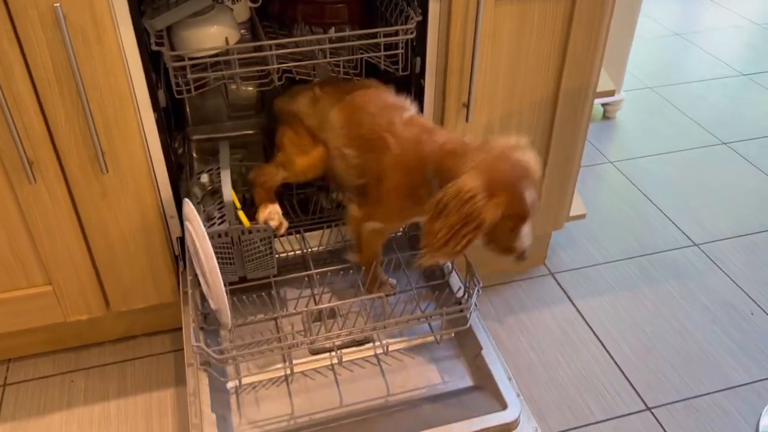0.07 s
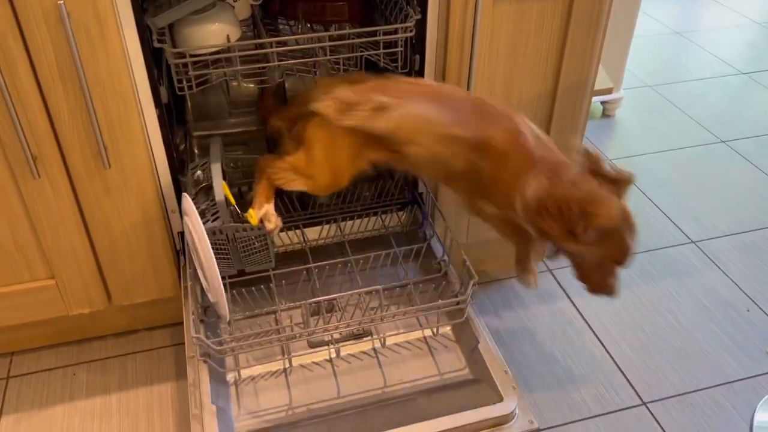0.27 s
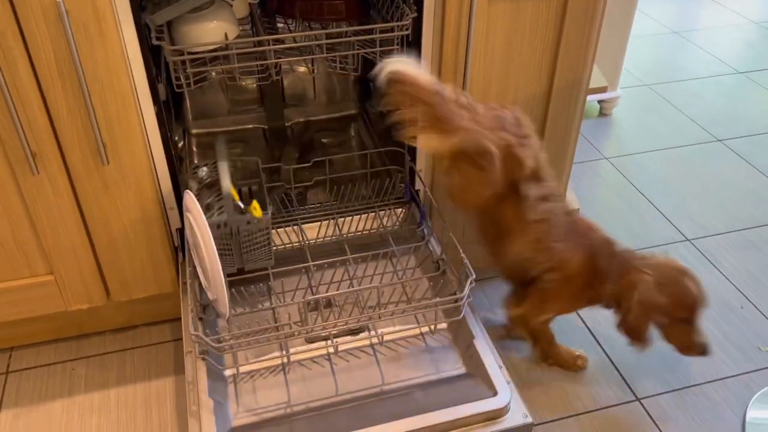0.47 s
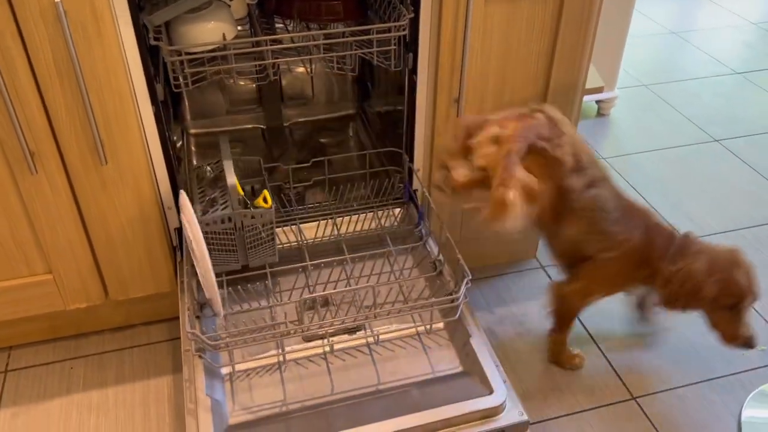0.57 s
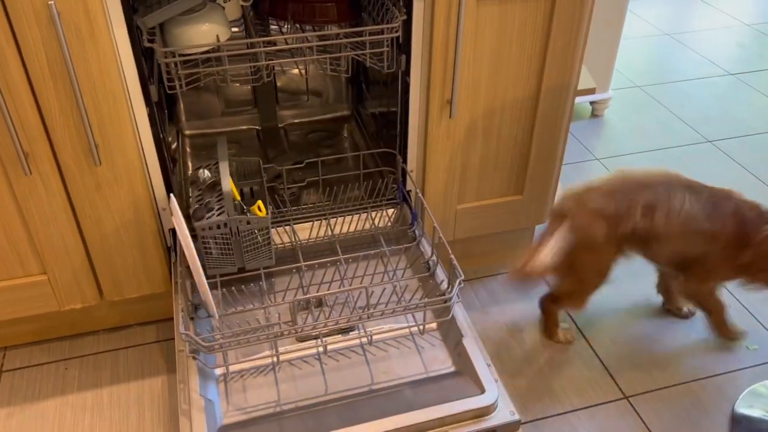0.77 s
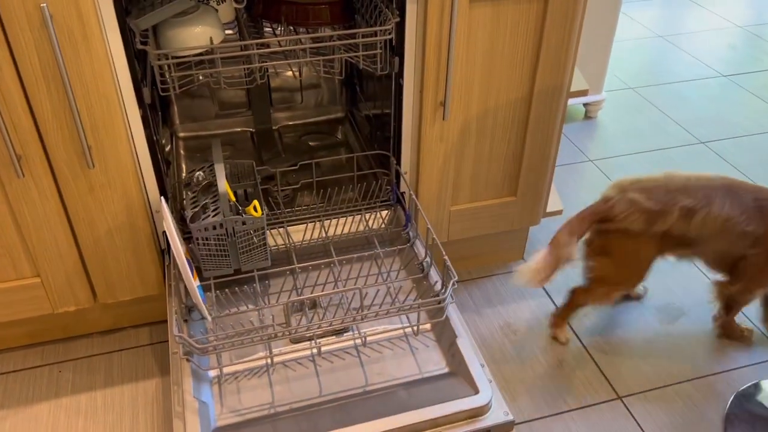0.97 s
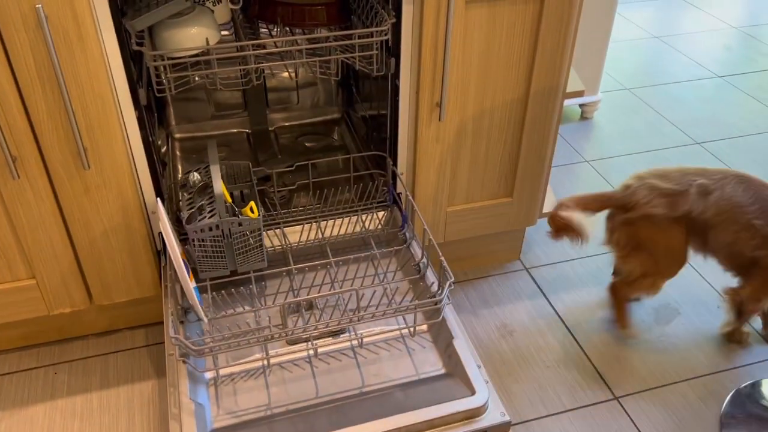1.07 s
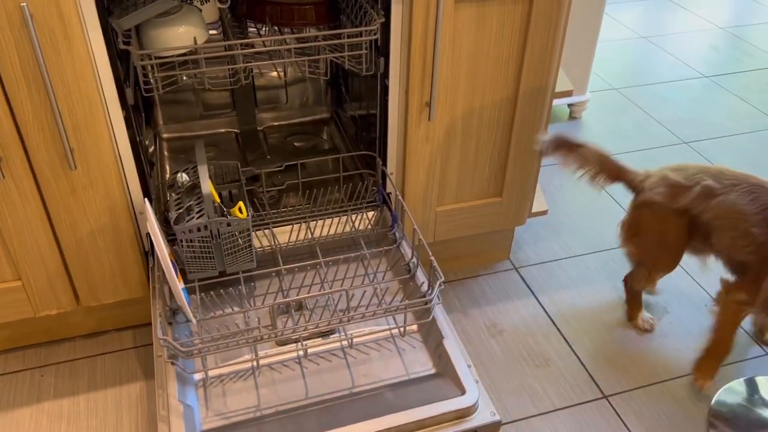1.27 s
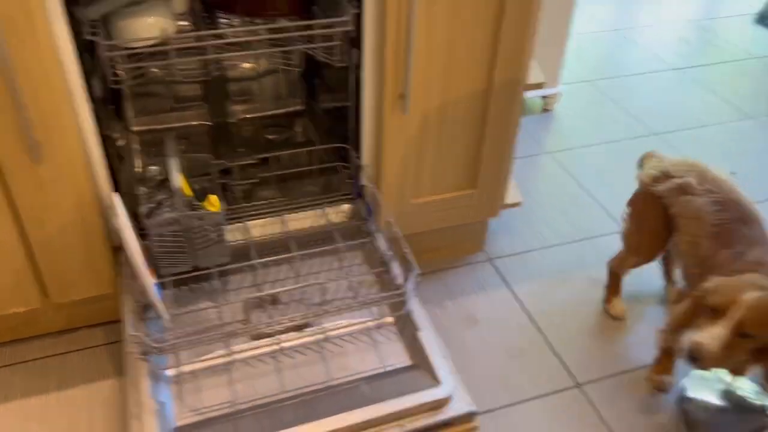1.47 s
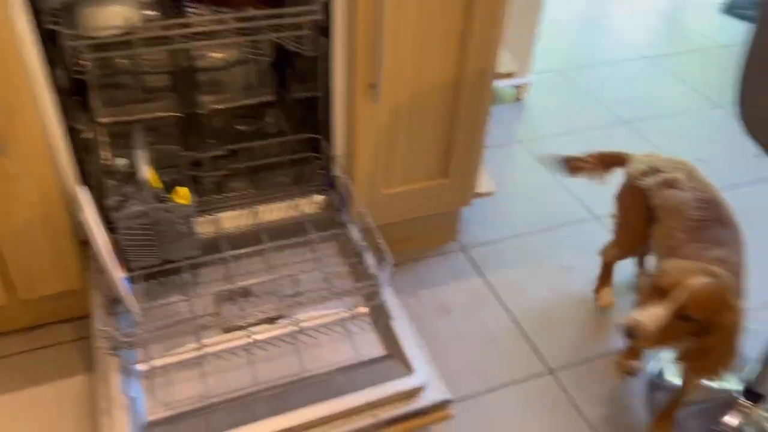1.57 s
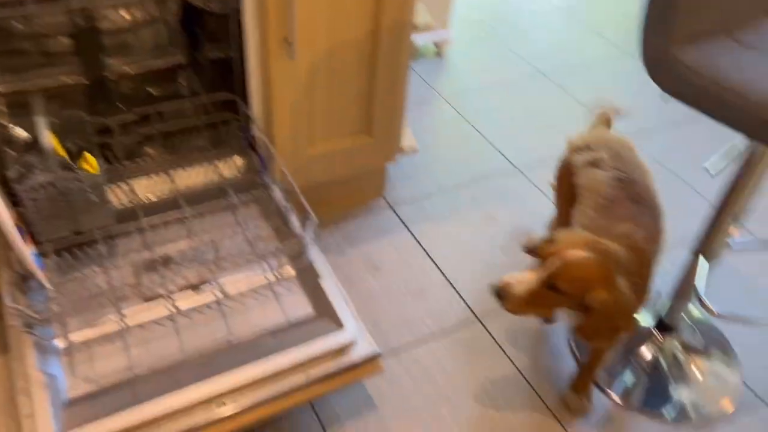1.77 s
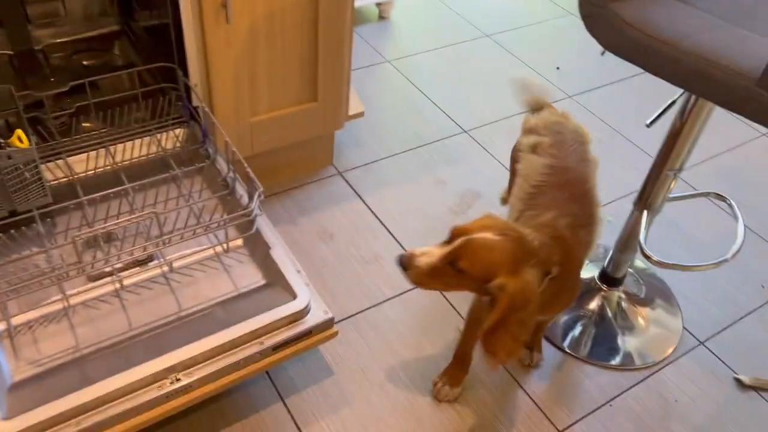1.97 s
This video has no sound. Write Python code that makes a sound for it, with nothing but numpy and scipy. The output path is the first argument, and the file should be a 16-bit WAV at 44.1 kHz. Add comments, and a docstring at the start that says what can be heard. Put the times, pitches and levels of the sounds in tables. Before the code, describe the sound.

A dishwasher rack rattles loudly from the very start as a dog scrambles out: dense wire chatter, sharp clacks, bright cutlery clinks and hollow door thumps, strongest until 0.6 s. Looser knocks follow, with a distinct clack near 0.88 s, fading by 1.2 s. A faint dull thud at 1.37 s, then very quiet claw ticks and a slight paw scuff around 1.8 s, over low kitchen hum. Close, leaning left.

```python
"""A dishwasher rack rattles, clacks and twangs as a dog scrambles out over the open door in a tiled kitchen.
Shaken wires and the hollow tub are random contacts with their own resonances; cutlery rings as damped modes
roughened by chatter, and paws thump on the door. The rattle dies away, then claws tick and a paw drags
on the tiles. A quiet room hum of coloured noise runs underneath."""
import sys
import numpy as np
from scipy import signal
from scipy.fft import rfft, irfft, next_fast_len
from scipy.io import wavfile
from scipy.ndimage import uniform_filter1d, map_coordinates

SR = 44100
rng = np.random.default_rng(int(sys.argv[2]) if len(sys.argv) > 2 else 0)


def pcm_store(signal):
    """Save signal as 16-bit PCM."""
    levels = np.round(np.clip(np.atleast_2d(signal), -1, 1) * 32767)
    wavfile.write(sys.argv[1], SR, levels.astype(np.int16).T)


N = 89478
T = np.arange(SR * 3 // 4) / SR  # time axis of one struck sound, s


def amp(db):
    """Decibels to gain."""
    return 10 ** (np.asarray(db) / 20)


def along(points, hz):
    """Read (Hz, value) points on a log frequency axis."""
    point_hz, value = np.transpose(points)
    return np.interp(np.log(hz + 1), np.log(point_hz + 1), value)


def level(rows):
    """Gain per sample from (s, dB) points, fading 202 dB a second after the last."""
    s, db = np.transpose(rows)
    t = np.arange(N) / SR
    return amp(np.interp(t, s, db) - 202 * np.maximum(t - s[-1], 0))


def fade(t60):
    """A decay of 60 dB in t60 seconds."""
    return 1000 ** (-T / np.maximum(t60, 1e-3))


def soft_start(rise_s):
    """An exponential swell that takes the edge off an attack."""
    return 1 - np.exp(-T / rise_s)


def add(out, s, x):
    """Mix x in at s seconds."""
    i = max(0, round(s * SR))
    out[:, i:i + x.shape[1]] += x[:, :N - i]


# how alike left and right are in noise: freq_hz, correlation
STEREO_LIKENESS = [(100, .97), (250, .9), (500, .55), (1000, .3), (2200, .55), (4500, .25), (8000, .2),
                   (13000, .4)]


def noise(colour, size, bright_db=0):
    """Coloured stereo noise of rms 1 before bright_db tilts its treble."""
    hz = np.fft.rfftfreq(size, 1 / SR)
    turn = np.arccos(np.clip(along(STEREO_LIKENESS, hz), -1, 1)) / 2
    spectra = rfft(rng.standard_normal((2, size))) * amp(along(colour, hz))
    mid, side = spectra * [np.cos(turn), np.sin(turn)]
    pair = np.array([mid + side, mid - side])
    share = along([(2800, 0.045), (6000, 0.84)], hz)  # part of bright_db applied at each frequency
    return irfft(pair * amp(bright_db * share), size) / irfft(pair, size).std()


# how long the kitchen rings on: freq_hz, t60_s
KITCHEN_DECAY = [(100, 0.54), (400, 0.86), (2500, 0.54), (7000, 0.21), (15000, 0.1)]


def blow(colour, t60, room_db, bright_db=0):
    """A short noise burst plus the kitchen's answer, whose treble dies first."""
    hz, t, cells = signal.stft(noise(colour, len(T), bright_db), SR, nperseg=256)
    decay = 1000 ** (-t / along(KITCHEN_DECAY, hz)[:, None])
    tail = signal.istft(cells * decay, SR, nperseg=256)[1][:, :len(T)]
    burst = noise(colour, len(T), bright_db) * fade(t60)
    return burst + amp(room_db) * tail * soft_start(0.012)


def wobble(rate):
    """A smooth random curve, rate knots a second."""
    return map_coordinates(rng.standard_normal(400), [T * rate], mode="wrap")


# loose pieces touch while ringing: random swings of level and phase
CHATTER_PER_S, CHATTER_DB, CHATTER_RAD = 78, 4, 0.94


def ring(modes, scatter_db=-1.5, chatter=False):
    """Damped modes; left and right drift out of step towards the treble, and chatter roughens them."""
    out = np.zeros((2, len(T)))
    for hz, db, t60 in modes:
        side_spread = rng.normal(0, 1, (2, 1)) * min(hz / 4000, .35)
        phase = rng.uniform(0, 2 * np.pi) + side_spread
        db = db + scatter_db * rng.normal()
        if chatter:
            phase = phase + CHATTER_RAD * wobble(CHATTER_PER_S)
            db = db + CHATTER_DB * wobble(CHATTER_PER_S)
        out += amp(db) * np.sin(2 * np.pi * hz * T + phase) * fade(t60)
    return out


def pitched(modes, hz, chatter=False):
    """A set of modes, given as pitch ratios, rung at one pitch."""
    return ring([(hz * ratio, db, t60) for ratio, db, t60 in modes], chatter=chatter)


def rattle(curve, colour, modes, rate, spread_db, t60, room_db, ring_db, count=3):
    """Random contacts at count spots, each with its own response, levelled to follow a curve."""
    out = np.zeros((2, N))
    lead_in = len(T)  # contacts begin early, so the rattle is in full swing at the start
    for _ in range(count):
        struck = rng.random(N + lead_in) < rate / count / SR
        strength = amp(spread_db * np.clip(rng.standard_normal(N + lead_in), -2, 1.5))
        hits = struck * strength
        body = blow(colour, t60, room_db) + amp(ring_db) * ring(modes)
        out += signal.fftconvolve(hits[None], body, axes=1)[:, lead_in:lead_in + N]
    power = uniform_filter1d((out ** 2).mean(0), size=2400)
    slow_rms = np.sqrt(np.abs(power) + 1e-12)
    return out / slow_rms * level(curve)


# how hard the rack shakes: time_s, level_db
SHAKE = [(0.0, -20), (0.085, -27), (.195, -34.5), (.22, -27.5), (.33, -36.5), (0.444, -32), (0.52, -34.5),
         (0.64, -42), (0.822, -50.5), (1.252, -71.5), (1.3, -71)]
# tone of the chattering wires: freq_hz, level_db
WIRE_COLOUR = [(600, -23), (1300, -4.5), (2300, -3.5), (3300, -7.5), (4500, -4), (6500, -5), (8000, -9),
               (11000, -19), (16000, -30.5)]
# resonances of the wire rack: freq_hz, level_db, t60_s
RACK_MODES = [(2052, -3, .25), (2230, 0, .15), (2320, -1, .2), (2560, -3, .1), (2970, -4, .15),
              (3320, -6, .1), (3550, -7, .12), (5540, -10, .12)]
# swell of the hollow tub and door: time_s, level_db
TUB = [(0.0, -23.5), (0.14, -32), (0.166, -25), (0.19, -34), (0.224, -25), (0.286, -33), (0.3, -26.5),
       (0.38, -33), (0.506, -30.5), (0.752, -42.5), (0.766, -45.5), (0.792, -40), (1.032, -52.5),
       (1.3, -57.5)]
# tone of the hollow tub: freq_hz, level_db
HOLLOW_COLOUR = [(40, -21.5), (90, -4.5), (140, -9.5), (200, 4), (330, -0.5), (520, -4), (800, -5.5),
                 (1300, -9), (2200, -27.5), (5000, -54)]
# resonances of the tub: freq_hz, level_db, t60_s
TUB_MODES = [(195, -4, .5), (237, -1, .65), (340, 0, .35), (415, -3, .15), (475, -5, .18), (574, -7, .12),
             (735, -4, .1), (857, -9, .12), (935, -3, .15), (1180, -3, .25), (1260, -5, .15),
             (1527, -4, .25)]
# swell of the cutlery's jingle: time_s, level_db
JINGLE = [(0.0, -22), (0.07, -26.5), (0.076, -40.5), (0.15, -40), (0.158, -19.5), (0.196, -44.5),
          (0.222, -26), (0.34, -41), (0.364, -27.5), (0.404, -32), (0.572, -41), (0.602, -43.5),
          (0.694, -46.5), (0.766, -53.5), (0.814, -56.5), (1.1, -99)]
# tone of the fine jingle: freq_hz, level_db
JINGLE_COLOUR = [(5000, -36), (9000, -1.5), (12000, 3), (13800, 5), (15800, -3.5)]


def shaking():
    """Dense random contacts make the wires chatter, the tub resound and the cutlery jingle."""
    wires = rattle(SHAKE, WIRE_COLOUR, RACK_MODES, rate=330, spread_db=0, t60=0.024,
                   room_db=-12.5, ring_db=-19)
    tub = rattle(TUB, HOLLOW_COLOUR, TUB_MODES, rate=300, spread_db=4, t60=.03,
                 room_db=-15.0, ring_db=-14.5)
    jingle = rattle(JINGLE, JINGLE_COLOUR, [], rate=690, spread_db=4.5, t60=0.061,
                    room_db=-10.5, ring_db=0)
    return amp(-3) * wires + amp(-1) * tub + amp(-2.5) * jingle


# partials of a flicked part: pitch_ratio, level_db, share_of_ring_time
TINE_MODES = [(1.002, -4, 1), (1.478, -9, .7), (2.3, -6.5, 0.6)]


def pings(curve, rate, low_hz, high_hz, t60, ping_db, spread_db=3, tick_db=-8):
    """Loose parts are flicked at random: a tick and a short ring at each part's own pitch."""
    out = np.zeros((2, N))
    gain = level(curve)
    tick_colour = [(low_hz / 2, -20), (low_hz, 0), (high_hz, -4), (high_hz * 2, -25)]
    tick = noise(tick_colour, len(T)) * fade(0.0068)
    for when, pitch, size, life in rng.random((int(rate * N / SR), 4)):
        hz = low_hz * (high_hz / low_hz) ** pitch
        ring_s = t60 * (.5 + life)
        part = pitched([(ratio, db, share * ring_s) for ratio, db, share in TINE_MODES], hz)
        strength = gain[int(when * N)] * amp(ping_db + spread_db * np.log(size + 1e-3))
        add(out, when * N / SR, strength * (part + amp(tick_db) * tick))
    return out


def loose_parts():
    """The rack's tines clink with its shaking; its plastic basket and runners knock lower with the tub."""
    tines = pings(SHAKE, rate=210, low_hz=1399, high_hz=5990, t60=0.063, ping_db=.5)
    basket = pings(TUB, rate=80, low_hz=438, high_hz=1004.4, t60=0.08, ping_db=-3.5)
    return tines + basket


# clacks of the rack on the door: start_s, level_db, treble_tilt_db, rebound_after_s
CLACKS = [(.001, -14, 7, 0.0063), (0.012, -16, 3, 0.0071), (.026, -20.5, -11, 0.013), (.062, -18, 6, 0.012),
          (0.157, -22, 3.5, 0.0073), (.2068, -11.5, -4, 0.0027), (0.215, -20.5, 2, 0.0043),
          (0.26, -15, 2.5, 0.0032), (.2947, -21.5, 2, 0.0037), (.362, -18, -6, 0.012),
          (.434, -22, 10, 0.0041), (0.512, -20, 2.5, 0.0082), (.546, -15.5, -7.5, 0.0044),
          (.677, -25.5, 7, .003), (.831, -31.5, -4.5, .005), (0.8765, -18, -7, 0.0078),
          (.935, -28.5, -14.5, .011), (1.12, -41.5, -17.5, 0.0042), (1.179, -39.5, -8, 0.0028)]
# tone of a clack: freq_hz, level_db
CLACK_COLOUR = [(150, -5.5), (700, -11), (1700, -7.5), (2400, -2), (3100, -2.5), (4200, -14), (6500, -9),
                (9000, -22.5), (14000, -22)]
REBOUND_DB = -2  # second contact against the first


def clacks():
    """The rack hits the door and rebounds: each contact is a crack, a longer shudder and a ring."""
    out = np.zeros((2, N))
    for s, db, bright_db, rebound_s in CLACKS:
        for when, size_db in [(s, db), (s + rebound_s, db + REBOUND_DB)]:
            crack = blow(CLACK_COLOUR, t60=0.0096, room_db=-20.5, bright_db=bright_db)
            shudder = blow(CLACK_COLOUR, t60=.04, room_db=-14, bright_db=bright_db)
            metal = ring(RACK_MODES, scatter_db=5)
            contact = amp(-5) * crack + amp(-1.5) * shudder + amp(-18.5) * metal
            add(out, when, amp(size_db - 6.5) * contact)
    return out


# short knocks of the rack's plastic wheels: start_s, level_db, pitch_hz
WHEELS = [(0.025, -5.5, 2350), (0.031, -12, 2330), (0.197, -14.5, 2460), (0.55, -22, 2260),
          (0.5956, -19.5, 2430), (0.8768, -19, 2560), (0.884, -22, 2580), (1.179, -36.5, 2530)]
# partials of a wheel: pitch_ratio, level_db, t60_s
WHEEL_MODES = [(.88, -12, 0.033), (1, -3, .016), (1.2, -14.5, 0.015)]


def wheels():
    """Plastic wheels knock: quickly damped modes with a little noise around the same pitch."""
    out = np.zeros((2, N))
    for s, db, hz in WHEELS:
        colour = [(hz / 2, -25), (hz, 0), (hz * 2, -28)]
        knock = pitched(WHEEL_MODES, hz) + amp(-23) * blow(colour, t60=.02, room_db=-18.0)
        add(out, s, amp(db) * knock)
    return out


# rack wires plucked into a buzz: start_s, level_db, pitch_hz
TWANGS = [(.209, -32.5, 2280), (.551, -29, 2060), (.597, -37, 2218), (0.936, -49.5, 2780)]
# partials of a plucked wire: pitch_ratio, level_db, t60_s
TWANG_MODES = [(1, 0, 0.27), (1.13, -12.5, 0.12), (1.6, -18, 0.14)]


def twangs():
    """Plucked rack wires ring with modes that chatter into a buzz."""
    out = np.zeros((2, N))
    for s, db, hz in TWANGS:
        add(out, s, amp(db) * pitched(TWANG_MODES, hz, chatter=True))
    return out


# clinks of cutlery and crockery: start_s, piece, level_db
CLINKS = [(0, "plate", -26.5), (0, "teaspoon", -37.5), (0, "spoon", -32.5), (.073, "fork", -23.5),
          (0.144, "spoon", -41), (.206, "spoon", -28), (0.206, "plate", -33), (.22, "teaspoon", -32),
          (0.359, "spoon", -31), (0.411, "spoon", -28.5), (.44, "teaspoon", -24), (0.537, "fork", -32),
          (0.612, "knife", -39), (.79, "fork", -53.5), (0.878, "knife", -56.5)]
# modes of each named piece: freq_hz, level_db, t60_s
CUTLERY = {"fork": [(7280, -9, .4), (12096, 0, .38), (12150, -10, .15), (14244, -4, .3), (15622, -2, .3)],
           "knife": [(6697, -1, .7), (6869, -11, .3), (7887, -5, .25), (9044, -7, .4), (14246, 4, .55)],
           "spoon": [(6869, -7, .4), (7887, -6, .4), (9044, -6, .4), (13151, -2, .25), (13733, -2, .25),
           (13850, -7, .15)], "teaspoon": [(7950, -12, .2), (15052, 0, .45), (15620, -7, .3)],
           "plate": [(858, 0, .6), (1180, -4, .35), (1525, -4, .35)]}


def cutlery():
    """Pieces knock together and ring on as damped modes, chattering in their basket."""
    out = np.zeros((2, N))
    for s, piece, db in CLINKS:
        add(out, s, amp(db) * ring(CUTLERY[piece], chatter=True) * soft_start(0.00075))
    return out


# paws thumping on the door: start_s, level_db, pitch_hz of the struck spot
THUMPS = [(.002, -15.5, 316.5), (.004, -16, 240), (.024, -21, 501), (.07, -21, 245), (0.152, -22, 185),
          (.295, -19, 365.5), (0.485, -30, 310), (.599, -26.5, 315), (0.778, -27, 211), (.793, -29, 381),
          (0.824, -28.5, 323.4), (0.927, -39, 395), (1.166, -53, 248), (1.357, -51.5, 221.6)]
# tone of a thump: freq_hz, level_db
THUMP_COLOUR = [(40, -23), (140, -17), (230, -0.5), (360, -3), (560, -5.5), (1200, -21), (3000, -21.5),
                (9000, -52)]
# partials of the door panel: pitch_ratio, level_db, t60_s
DOOR_MODES = [(1, 3.5, .15), (1.17, -9.5, .09), (1.55, -13.5, .08)]


def thumps():
    """Soft paws strike the door: a rounded burst plus door modes at the pitch of each spot."""
    out = np.zeros((2, N))
    for s, db, hz in THUMPS:
        burst = blow(THUMP_COLOUR, t60=0.15, room_db=-15)
        body = amp(-1.5) * burst + amp(-2.5) * pitched(DOOR_MODES, hz)
        add(out, s, amp(db - 3) * body * soft_start(0.0049))
    return out


# deep dull thuds: start_s, level_db, pitch_hz
THUDS = [(0.17, -32, 80), (.34, -37, 52.24), (0.491, -38.5, 49.4), (0.548, -37.5, 50.4),
         (0.649, -42.5, 57.4), (0.799, -38.5, 90), (1.368, -36.5, 54.7)]


def thuds():
    """Deep thuds: low sines that swell to a peak in 14 ms and sink away."""
    out = np.zeros((2, N))
    u = T / 0.014
    for s, db, hz in THUDS:
        add(out, s, amp(db) * u * np.exp(1 - u) * np.sin(2 * np.pi * hz * T)[None])
    return out


# claws on the tiles: start_s, level_db, pitch_hz
CLAWS = [(1.439, -53.5, 2190), (1.561, -59.5, 2207), (1.685, -60, 2300), (1.803, -55.5, 3410),
         (1.862, -55.5, 2000), (2.002, -57.5, 4900), (2.013, -58.5, 3800)]
# partials of a claw tick: pitch_ratio, level_db, t60_s
CLAW_MODES = [(.9, -11, 0.021), (1.07, -6, 0.015)]


def claws():
    """Claws tick on the tiles: two short modes and a noise burst around the same pitch."""
    out = np.zeros((2, N))
    for s, db, hz in CLAWS:
        colour = [(hz / 3, -12), (hz, 0), (hz * 2, -17), (hz * 4, -28)]
        tick = pitched(CLAW_MODES, hz) + amp(-6.5) * blow(colour, t60=0.0306, room_db=-9)
        add(out, s, amp(db) * tick)
    return out


# a paw drags over the tiles: time_s, level_db
DRAG = [(1.78, -97.5), (1.81, -65), (1.868, -66.5), (1.9, -69.5), (1.96, -81.5)]
# tone of the scuff: freq_hz, level_db
SCUFF_COLOUR = [(500, -15.5), (1900, -0.5), (3000, -0.5), (4500, -9.5), (8000, -11), (14000, -17.5)]


def scuff():
    """A dragging paw makes a dense run of tiny contacts without any ringing."""
    return rattle(DRAG, SCUFF_COLOUR, [], rate=700, spread_db=3, t60=.018, room_db=-15.0, ring_db=0)


# tone of the room hum: freq_hz, level_db
HUM_COLOUR = [(20, -15.5), (50, 0), (100, -5.5), (135, -5.5), (165, -6.5), (200, -9.5), (280, -21),
              (365, -8.5), (420, -19.5), (700, -18), (1000, -10), (1350, -20), (1850, -29), (3200, -39.5),
              (5200, -50), (7300, -45.5), (14500, -48), (15800, -55)]


def room_hum():
    """Steady, mostly low coloured noise all around."""
    return amp(-55.5) * noise(HUM_COLOUR, N)


# loudness of left over right: freq_hz, difference_db
LEFT_OVER_RIGHT = [(100, 0), (400, .8), (850, 4), (2200, 2.5), (4500, 4), (6700, 5), (8500, 0), (14000, 0)]
# phase by which left leads right: freq_hz, lead_rad
LEFT_LEAD = [(100, 0), (350, .22), (1100, 1), (2200, .45), (4500, .9), (7000, -.4), (8000, -.7),
             (9200, -2.8), (12500, -6), (14400, -6.6), (15400, -8.2)]


def place_left(sources):
    """Lean the sources to the left by level and phase, shared equally between both sides."""
    m = next_fast_len(N + SR // 2)
    hz = np.fft.rfftfreq(m, 1 / SR)
    lean = amp(along(LEFT_OVER_RIGHT, hz) / 2) * np.exp(.5j * along(LEFT_LEAD, hz))
    return irfft(rfft(sources, m) * [lean, 1 / lean], m)[:, :N]


def scene():
    """The dishwasher and the dog sound from the left; the hum is all around."""
    rack = shaking() + loose_parts() + clacks() + wheels() + twangs()
    dog = thumps() + thuds() + claws() + scuff()
    return place_left(rack + cutlery() + dog) + room_hum()


# narrow gap in the treble: freq_hz, gain_db
TREBLE_GAP = [(8500, -0.5), (9300, -4.5), (9800, -52.5), (10800, -22.5), (11300, -2.5), (11900, -1)]
LOW_CUT_HZ, TOP_HZ = 35, 15900


def record(dry):
    """The deepest bass rolls off; the treble has a narrow gap and ends at TOP_HZ."""
    m = next_fast_len(N + SR // 2)
    hz = np.fft.rfftfreq(m, 1 / SR)
    low_cut = hz ** 2 / np.sqrt(hz ** 4 + LOW_CUT_HZ ** 4)
    response = low_cut * amp(along(TREBLE_GAP, hz)) * (hz < TOP_HZ)
    return irfft(rfft(dry, m) * response, m)[:, :N]


dry = scene()
out = record(dry)
pcm_store(out)
```